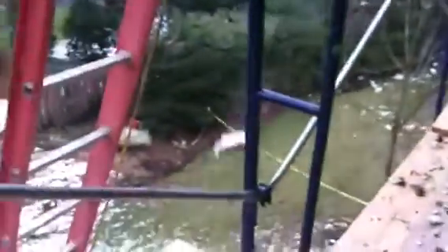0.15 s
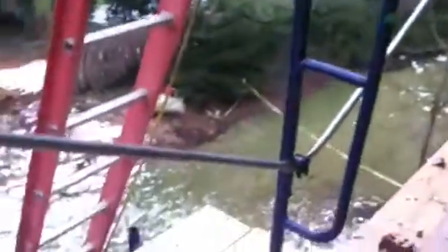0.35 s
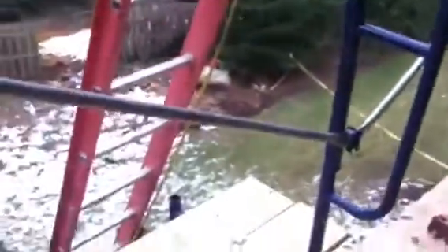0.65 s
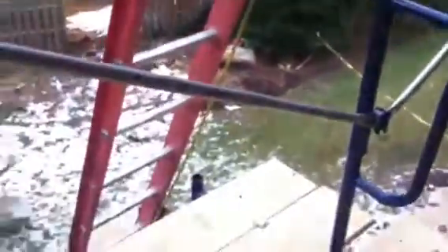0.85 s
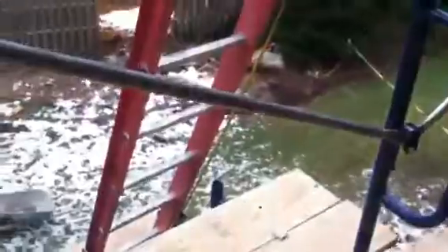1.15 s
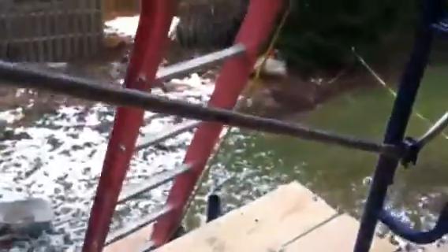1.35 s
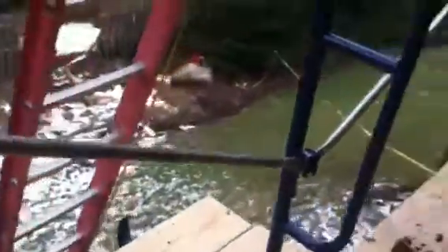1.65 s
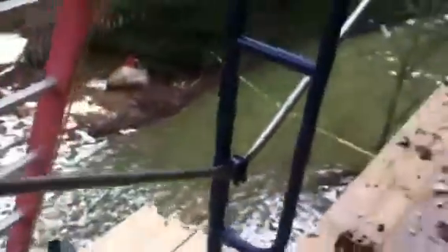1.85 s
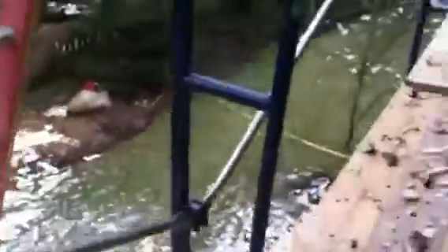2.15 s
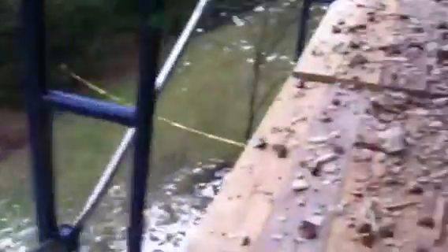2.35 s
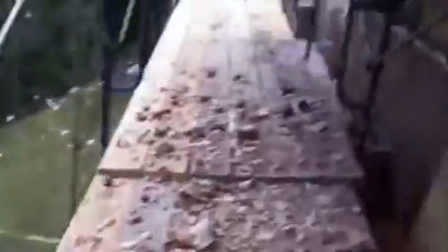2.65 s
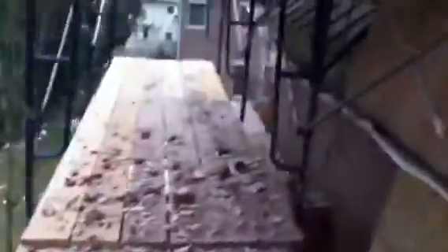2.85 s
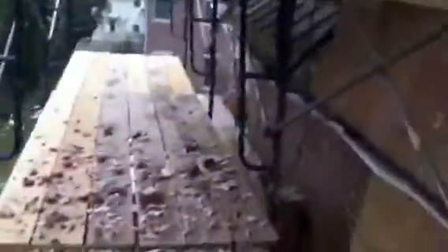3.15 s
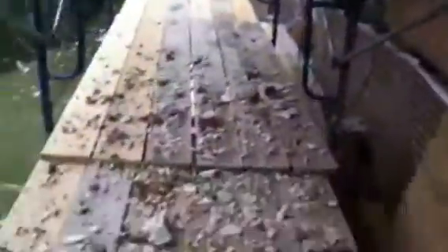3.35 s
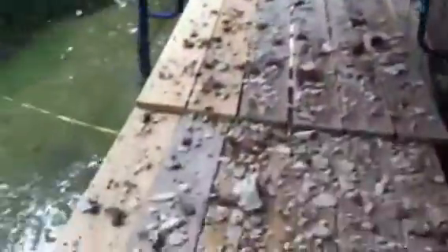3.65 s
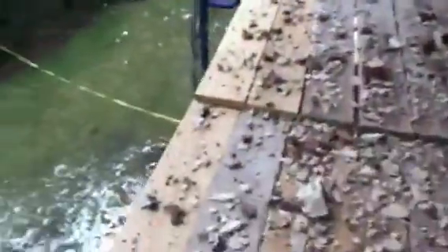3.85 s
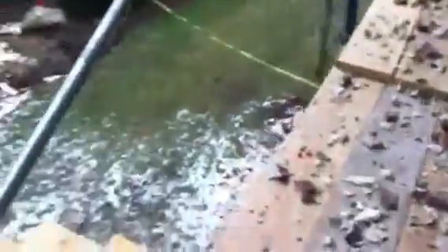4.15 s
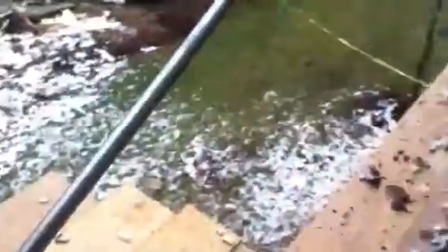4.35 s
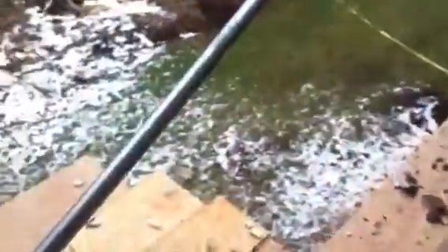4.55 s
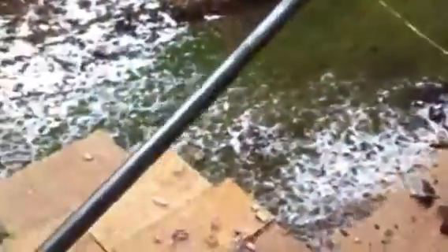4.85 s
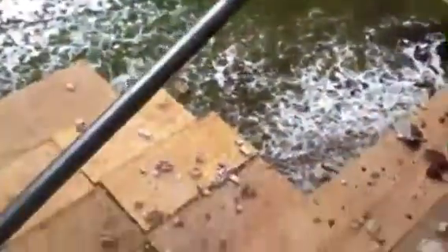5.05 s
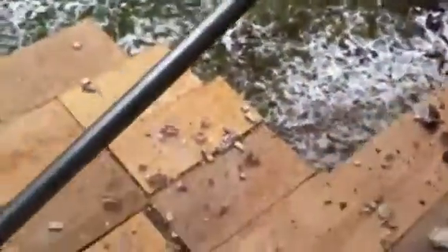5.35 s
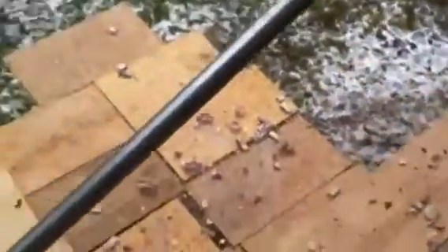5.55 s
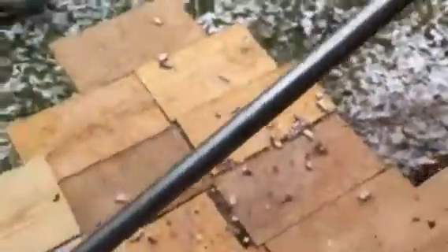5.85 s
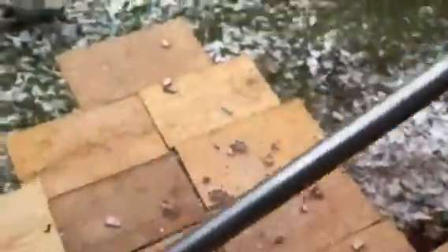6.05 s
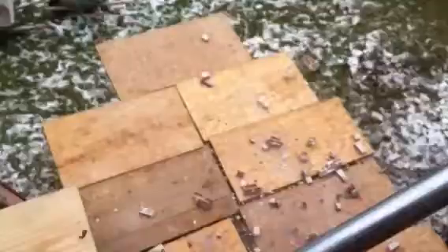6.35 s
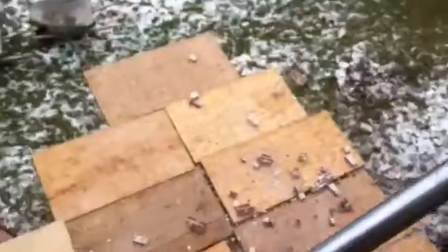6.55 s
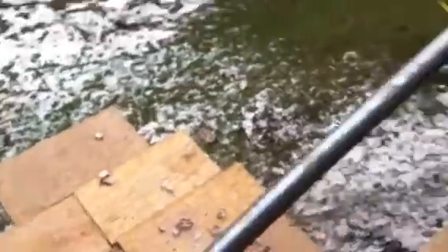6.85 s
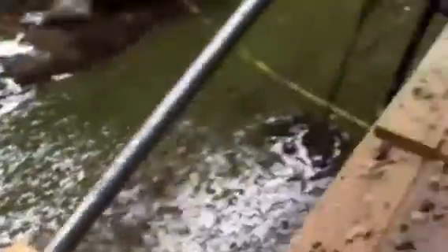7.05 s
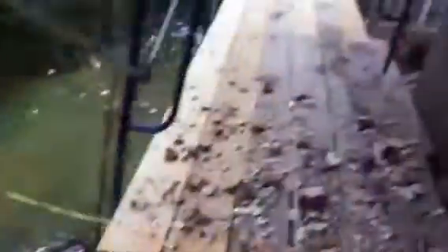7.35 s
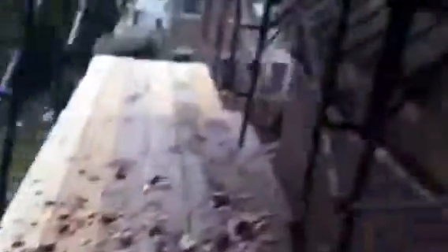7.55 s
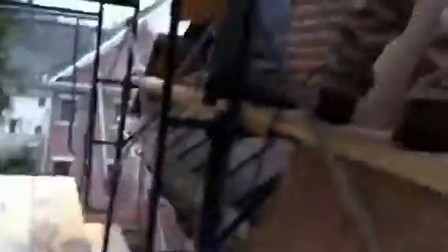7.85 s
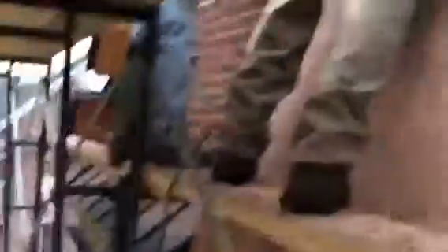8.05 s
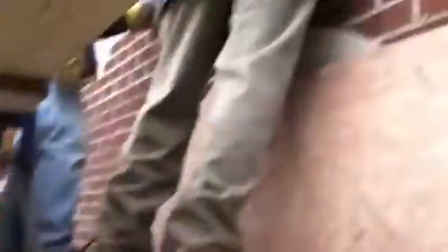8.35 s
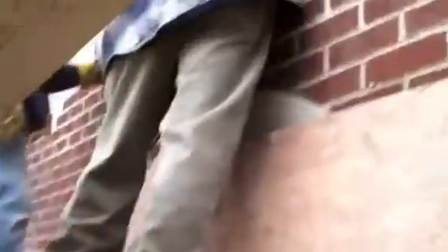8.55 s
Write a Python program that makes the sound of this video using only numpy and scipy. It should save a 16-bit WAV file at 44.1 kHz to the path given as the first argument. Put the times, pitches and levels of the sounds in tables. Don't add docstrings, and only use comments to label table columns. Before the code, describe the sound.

Quiet yard noise and rapid light brick taps open; then a motor whirs upward as a brick chunk lands with a woody crack. Bright steel chatter comes in separate bursts against the wall, followed by continuous fast machine-gun hammering, gritty and ringing, with thuds in brick, boards and tubes. The tone shifts as the listener turns on the scaffold. Thin bass, limited loudness, close small microphone.

```python
import sys
import numpy as np
from scipy import signal
from scipy.fft import rfft, irfft, next_fast_len
from scipy.io import wavfile
from scipy.ndimage import uniform_filter1d, minimum_filter1d, map_coordinates

SR = 44100
rng = np.random.default_rng(int(sys.argv[2]) if len(sys.argv) > 2 else 0)


def generate_wav(sig):
    pcm = np.round(np.clip(np.atleast_2d(sig).T, -1, 1) * 32767).astype(np.int16)
    wavfile.write(sys.argv[1], SR, pcm)


def attenuation_scalar(level_db):
    decades = np.asarray(level_db, float) / 20
    return 10 ** decades


N = 383669

# time_s, rate_hz
PISTON_RATE = [(0, 53), (3.5, 52.6), (3.85, 50), (4.1, 48.6), (4.45, 47.9), (7, 47.86), (7.3, 47.93),
               (8.7, 47.92)]
BLOW_AT_S = 6.0088
# start_s, peak_db
STRIKES = [(1.6113, -7), (1.6308, -8), (1.6477, -17), (1.7011, -18), (1.753, -12.5), (1.7694, -6),
           (1.7864, -17), (1.8109, -12), (1.8757, -21), (1.8907, -19), (1.9121, -13), (1.9311, -11),
           (1.944, -4), (1.9889, -19), (2.0558, -7.5), (2.0728, -7), (2.0902, -4), (2.1097, -11),
           (2.1326, -15), (2.2025, -25), (2.2174, -18), (2.2389, -18), (2.2573, -10), (2.2743, -10),
           (2.3047, -11), (2.3446, -20), (2.4065, -14), (2.426, -19), (2.4439, -13), (2.4634, -14),
           (2.4818, -13), (2.5138, -12), (2.5522, -16), (2.6065, -4), (2.622, -1), (2.7562, -22),
           (2.7772, -14), (2.7961, -24), (2.8156, -27), (2.9962, -21), (3.0336, -15), (3.0535, -18.5),
           (3.1937, -6), (3.2107, -8), (3.2276, -2), (3.2461, -5), (3.3384, -15), (3.3558, -10),
           (3.3888, -9), (3.4855, -5)]
# touch_s, rise_s, fall_s, ring_peak_db, scrape_peak_db
BOUNCES = [(1.624, 0.0064, 0.055, -5.5, -14), (1.75, 0.053, 0.037, -5.5, -15.5),
           (1.891, 0.086, 0.042, -9.5, -16), (2.055, 0.054, 0.047, -6, -16.5),
           (2.238, 0.073, 0.058, -6.5, -16.5), (2.422, 0.074, 0.074, -7, -15.5),
           (2.606, 0.0043, 0.095, -4.5, -13.5), (2.776, 0.033, 0.048, -16.5, -21.5),
           (2.994, 0.0038, 0.56, -43, -27.5), (3.029, 0.028, 0.034, -18, -34),
           (3.192, 0.054, 0.023, -5.5, -23), (3.336, 0.042, 0.057, -6.5, -19)]
# time_s, ring_db, push_db
WORK = [(3.477, -30, -37), (3.5, -14, -20), (4, -16, -19.5), (4.5, -20, -21), (4.75, -18, -17.5),
        (5.4, -19, -17.5), (6.1, -16, -17.5), (6.3, -15.5, -19.5), (7.2, -19, -18), (7.45, -15.5, -17.5),
        (8.7, -18, -19.5)]
# centre_s, length_s, ring_db, push_db
SLIPS = [(3.52, 0.073, 4, -1.5), (3.62, 0.056, -5, -7), (3.74, .03, 8, 3.5), (3.84, 0.053, 11, 2.5),
         (3.91, 0.15, -1.5, -3.5), (4.03, 0.12, 1, -1.5), (4.3, 0.21, 4.5, 1), (4.4, 0.16, -3.5, -4),
         (4.51, 0.039, 3.5, 0), (4.81, 0.091, 6.5, 0), (4.865, 0.052, -4, -1), (5.13, 0.078, -1.5, -1),
         (5.385, 0.073, 8, 2), (5.48, 0.044, -1, -3), (5.64, 0.34, 5.5, 0.5), (5.74, 0.13, -5.5, -2),
         (5.89, 0.026, 13.5, 9), (6.14, 0.087, 5, 0.5), (6.21, 0.15, -3.5, -2), (6.49, 0.13, 2, 0.5),
         (7.39, 0.079, 4.5, 1), (7.7, 0.016, 7, 2), (7.87, 0.047, 2.5, -2), (8.1, 0.045, 7, 4),
         (8.6, 0.14, -2, 1.5), (8.69, 0.076, 4, 2)]
# time_s, share (0-1)
LOOSENESS = [(3.4, .6), (4.5, .72), (5.7, .78), (5.9, .45), (6.3, .3), (7.25, .32), (7.35, .6), (7.55, .55),
             (7.7, .45)]
# time_s, share (0-1)
REPEATABILITY = [(3.5, .2), (3.9, .5), (4.3, .65), (4.4, .4), (4.6, .7), (6.3, .78), (7.3, .77), (7.45, .6),
                 (7.7, .77)]
BIT_HZ = [4890, 7580, 7870, 8300, 8750, 10000, 10700, 11310, 12500, 14505, 15700]
# width_hz, level_db
BIT_WIDTHS = [(60, -8), (62, 5.5), (56, 8), (450, -14), (170, -9), (95, -14.5), (119, -23), (179, -20),
              (150, -21), (70, -14), (120, -22)]
# centre_s, length_s, level_db
GRIP = [(1.65, .08, 0), (1.81, .06, 5), (1.96, .12, 0), (2.1, 0.098, 7), (2.28, .06, -8),
        (2.335, 0.027, 15), (2.5, .15, -10), (2.63, .06, -17), (2.69, .03, 6), (3.2, .04, -2),
        (3.25, .04, -3), (2.8, .1, -6), (3.6, .25, -6), (3.85, 0.083, -3), (4.8, 0.28, 5.5),
        (5.48, 0.092, 1), (5.66, .12, -2), (6.4, .2, -3), (7.3, .4, 3), (7.6, .12, -4), (5.4, 0.93, 8),
        (6.5, 0.93, 5.5), (8.4, 0.73, -6)]
# pitch_hz, width_hz, level_db
SHANK = [(2670, 90, 0), (3880, 85, 0)]
SHANK_DB = [
    [-34.5, -32.5, -33.5, -39, -31.5],
    [-40, -39.5, -43, -35.5, -43.5],
]
SHANK_LOOSE_DB = [8, 4]
# centre_s, length_s, low_mode_db, high_mode_db
TWISTS = [(3.5, 0.081, -4, -4), (4, 0.13, 7.5, 6), (4.337, 0.072, 6.5, 14), (5.07, 0.074, 8, 11),
          (5.42, .08, 5, -6), (5.595, 0.15, 4, 1), (5.78, .15, 2, 0), (5.907, 0.11, 13, -7),
          (6.937, 0.097, 1, 6), (6.68, .15, -3, 2), (7.172, 0.13, 2, 4), (7.7, .25, -2, 2),
          (7.373, 0.29, 0, 11.5), (8.117, 0.089, 1, -5), (8.656, 0.18, 8, 2)]
SCRAPE_BENDS = [0.22, 0.082]
# pitch_hz, level_db
SKID = [(100, -18), (200, -4), (600, -3.5), (1400, -10), (2500, -3), (3400, 0.5), (3900, -6), (4400, -8),
        (6300, -11), (9000, -10), (12000, -20), (14000, -55)]
# pitch_hz, level_db
THUD = [(24, -76), (40, -73), (108, -22), (140, -7.5), (282, -0.5), (313, -5.5), (521, -2), (832, -10.5),
        (900, -24), (1170, -18), (1980, -120)]
THUD_DB = [-8.5, -9.5, -9, -9, -8]
# pitch_hz, level_db
CRUSH = [(400, -64), (700, -1), (1200, 2), (1900, 4), (3000, 2), (4400, -9.5), (6300, -9.5), (9500, -11),
         (11800, -18.5), (15500, -38)]
# centre_s, length_s, thud_db, crush_db
CHIPS = [
    (4.75, 0.081, 5.5, 1),
    (5.925, 0.013, 7, 16),
    (7.53, 0.011, 1, -3),
    (8.13, 0.044, 0, -1.5),
]
# time_s, direction (0-4)
TURN = [(4.1, 0), (4.55, 1), (5.0, 1), (5.2, 2), (6.1, 2), (6.3, 3), (7.25, 3), (7.42, 4)]
# pitch_hz, width_hz, lift_db
FRAME = [
    [(197, 130, 8), (330, 86, 2.5), (650, 350, 8), (1340, 160, -6), (1790, 140, 7)],
    [(200, 60, 3.5), (287, 27, 8), (766, 25, 8), (1030, 70, 10), (1150, 30, -7), (1220, 70, 9.5),
     (1470, 130, 5), (1920, 180, 5)],
    [(240, 25, 7), (287, 22, 11), (332, 25, -14), (403, 70, 9.5), (750, 53, 4.5), (980, 65, -10),
     (1170, 200, 5.5), (1330, 60, -11), (1466, 150, 8), (1590, 60, -6), (1890, 70, -7), (2080, 70, 4)],
    [(274, 92, 5.5), (521.7, 17, 8), (575, 20, -7), (628, 23, 11), (875, 54, -4), (1160, 130, 2.5),
     (1490, 92, 5), (1720, 210, 3.5), (2020, 210, 7)],
    [(143, 25, 8), (187, 13, 11.5), (527, 14, 6), (575, 20, -4), (629, 28, 8), (814, 25, 9),
     (950, 140, 4.5), (1450, 100, 6.5), (1790, 100, 3.5), (1915, 30, -6)],
]
SLAP_S = [.002, .003, .004, .003, .0007]
SLAP_DB = [14, 14, 17, 22, 20]
OPEN_DB = [-3, -1, 1.5, 0.5, -3]
# time_s, level_db, low_lift_db
MOTOR = [(0.5, -49, -7), (0.62, -31, -16), (0.76, -27.5, -11), (0.82, -33.5, 4), (1.45, -28.5, -6.5),
         (2, -33.5, 5.5), (2.3, -34, -8.5), (2.8, -33.5, -3.5), (2.87, -33.5, -16), (2.98, -30, -29),
         (3.03, -29, -3), (3.15, -28.5, -6.5), (3.5, -38.5, -1)]
# pitch_hz, level_db
FAN = [(35, -80), (60, -46), (120, -8), (234, -1.5), (355, -5), (605, -9), (982, -8.5), (2200, -5.5),
       (4840, -15.5), (5430, -15.5), (11400, -30.5), (15000, -56)]
# pitch_hz, width_hz, level_db
HOUSING = [(3250, 70, 6), (5960, 60, 9)]
# time_s, drop_hz
LOAD_SAG = [(1.6, 0), (1.75, 330), (2.3, 400), (2.5, 500), (2.87, 460), (3.05, 280), (3.18, 240),
            (3.3, 400)]
# time_s, level_db
WHINE = [(.82, -62), (1, -51), (1.1, -42), (1.53, -37), (1.62, -54), (2.2, -46), (2.5, -46), (2.7, -52),
         (2.88, -45), (3.05, -41), (3.17, -40), (3.25, -52), (3.5, -60)]
# share of mesh pitch, level_db
GEARS = [(.265, -7), (.44, -10), (.5, 1), (.6, -10), (.73, -10), (.95, -22), (1.1, -23)]
# share of mesh pitch, level_db
HUM = [(.31, -9), (.41, -9), (.585, -12), (1.42, -24), (1.649, -16), (2, -29)]
# start_s, peak_db, low_part_db, t60_s
TAPS = [
    (0.044, -28, -5, 0.17),
    (0.103, -31, -16, 0.12),
    (0.124, -24.5, -2, 0.12),
    (0.172, -15, -8.5, 0.16),
    (0.245, -18, -5, 0.16),
    (0.297, -22.5, 5, 0.21),
    (0.35, -23.5, -4, 0.072),
    (0.407, -32, -9, 0.08),
    (0.533, -29, -28, 0.098),
]
# pitch_hz, level_db
BRICK = [(290, -19), (500, -16), (936, -11), (1190, -17), (1290, -10), (1550, -9), (2480, -18), (2820, -33),
         (14000, -50)]
# start_s, peak_db, crack_db, t60_s
DROPS = [
    (0.799, -5.5, 5, 0.46),
    (1.246, -13.5, 1.5, 0.56),
    (1.479, -26, -15, 0.45),
    (1.509, -21, -13, 1),
    (1.549, -17, -15, 0.46),
    (4.739, -21, 15, 0.46),
]
# pitch_hz, width_hz, level_db
PLYWOOD = [(170, 113, -3.5), (290, 87, 3.5), (432, 130, -1.5), (640, 200, -10)]
# pitch_hz, level_db
SPLIT = [(410, -43), (700, 6), (893, -16), (1020, -1), (2660, -6), (6040, -34), (8110, -23.5), (15000, -51)]
# pitch_hz, level_db
YARD = [(47, -54), (80, -5), (151, 6), (325, -3), (493, 7), (684, -0.5), (2780, -1.5), (5980, -20.5),
        (8120, -7), (15000, -45)]
# time_s, level_db
YARD_LEVEL = [(0.0, -45), (0.284, -55), (0.368, -45), (0.6, -42)]
# pitch_hz, level_db
PLANKS = [(20, -30), (60, -13), (130, -4), (200, -7), (400, -60)]


def bit(bite_db):
    burst, scratch = bounces()
    level = burst + attenuation_scalar(bite_db + 0.8 * wobble(9.6))
    accent = accents(burst)
    blow, _ = piston()
    shake = shocks(along(LOOSENESS), scatter_db=1.4, t60=.012, clean=.4, accent=accent)

    def ping():
        return attenuation_scalar(1.6 * rng.standard_normal(blow.max() + 1))[blow]

    low, *high = rings(shake, [(hz, *mode) for hz, mode in zip(BIT_HZ, BIT_WIDTHS)])
    ring = -attenuation_scalar(bumps(GRIP)[0]) * ping() * low
    for k, mode in enumerate(high):
        ring = ring + (-1) ** min(k, 3) * attenuation_scalar(1.6 * wobble(11)) * mode

    bend = 0
    settings = zip(SCRAPE_BENDS, SHANK_DB, SHANK_LOOSE_DB, bumps(TWISTS), rings(shake, SHANK))
    for share, db, loose_db, twist_db, mode in settings:
        bend_db = 0.5 * (bite_db + 12) + facing(db)
        bend_db = bend_db + loose_db * along(LOOSENESS) + twist_db + 0.7 * wobble(13)
        gain = share * scratch + (bite_db > -60) * attenuation_scalar(bend_db)
        bend = bend + gain * ping() * unit(mode)

    scrape = shocks(0.49, scatter_db=1.5, t60=0.14, accent=np.sqrt(accent))
    scrape = unit(filtered(scrape, colour(SKID)))
    return attenuation_scalar(-0.97) * level * even(ring) + bend + attenuation_scalar(-4.0) * scratch * scrape


def wall(bite_db, push_db):
    thud_db, crush_db = push_db + bumps(CHIPS)
    thud_db = thud_db + facing(THUD_DB) + 0.5 * wobble(9.2)
    crush_db = crush_db + 0.38 * wobble(11)
    blow, _ = piston()
    strength = attenuation_scalar(1.1 * rng.standard_normal(blow.max() + 1))[blow]
    blows = (np.diff(blow, prepend=blow[0]) != 0) * strength
    repeat_hz = 2570
    t = np.arange(3685) / SR
    f = np.fft.rfftfreq(len(t), 1 / SR)
    turn, echo = along(TURN), 0
    for k, view in enumerate(FRAME):
        slap = attenuation_scalar(SLAP_DB[k]) * (np.arange(len(t)) == round(SLAP_S[k] * SR))
        tails = rng.standard_normal((2, len(t))) * attenuation_scalar(-60 * t / .14)
        z = rfft(tails - [slap, 0 * t])
        lift = attenuation_scalar(sum(db / (1 + (2 * (f - c) / w) ** 2) for c, w, db in view))
        lift = lift / (1 + (f / repeat_hz) ** 6)
        firm, drift = irfft(z / np.abs(z) ** .9 * lift, len(t))
        near = blows * np.sqrt(np.clip(1 - np.abs(turn - k), 0, 1))
        echo = echo + signal.oaconvolve(near, firm)[:N]
        echo = echo + signal.oaconvolve(0.61 * near * wobble(2.203), drift)[:N]
    grit = unit(shocks(0.4, scatter_db=1.2, t60=0.15))
    grit = filtered(grit, lambda f: attenuation_scalar(5 / (1 + (repeat_hz / (f + 1)) ** 6)))
    same = along(REPEATABILITY)
    force = np.sqrt(same) * even(echo) + np.sqrt(1 - same) * 2.6 * grit
    thud = attenuation_scalar(thud_db) * even(filtered(force, colour(THUD)))
    crush = attenuation_scalar(crush_db - 2.5) * even(filtered(force, colour(CRUSH)))
    return (bite_db > -60) * (thud + crush)


def chisel():
    bite_db, push_db = work()
    tool = bit(bite_db) + wall(bite_db, push_db)

    def thin(f):
        return 1 / (1 + ((f - 5900) / 750) ** 4) + 1 / (1 + ((f - 12500) / 800) ** 4)

    return tool + (attenuation_scalar(facing(OPEN_DB)) - 1) * filtered(tool, thin)


def piston():
    t = np.arange(N) / SR
    rate = along(PISTON_RATE)
    turns = np.cumsum(rate) / SR
    turns = turns - turns[round(BLOW_AT_S * SR)] + 400
    hits = np.r_[0, np.sort(np.transpose(STRIKES)[0])]
    last = np.searchsorted(hits, t, "right") - 1
    early = t < WORK[0][0]
    blow = np.where(early, last, turns.astype(int))
    return blow, np.where(early, t - hits[last], (turns % 1) / rate)


def shocks(loose, scatter_db, t60, clean=0, accent=1):
    blow, since = piston()
    strength, rebound = rng.standard_normal((2, blow.max() + 1))[:, blow]
    later = since - .006 - 0.0013 * rebound
    struck = attenuation_scalar(-60 * since / t60) + .45 * (later > 0) * attenuation_scalar(-60 * np.abs(later) / t60)
    rattle = unit(attenuation_scalar(4 * wobble(220) + 1.6 * wobble(25)))
    loose = np.clip(loose, 0, 1)
    size = accent * attenuation_scalar(scatter_db * strength)
    at = np.flatnonzero(np.diff(blow)) + 1
    scatter = np.round(.0001 * SR * rebound[at]).astype(int)
    late = np.clip(at + scatter, 0, N - 1)
    click = np.sqrt((1 - loose) * clean) * unit(np.bincount(late, size[at], N))
    gate = np.sqrt((1 - loose) * (1 - clean)) * unit(size * struck) + np.sqrt(loose) * rattle
    return click + rng.standard_normal(N) * gate


def bounces():
    t, ring, scrape = np.arange(N) / SR, np.zeros(N), np.zeros(N)
    shape_db = [-35, -25, -20.5, 0, -14, -76]
    for s, rise, fall, ring_db, scrape_db in BOUNCES:
        off = s + rise + fall
        times = [s - 0.031, s - .004, s, s + rise, off, off + 0.12]
        under = np.interp(t, times, shape_db, -200, -200)
        ring = ring + attenuation_scalar(ring_db + under)
        scrape = scrape + attenuation_scalar(scrape_db + 0.71 * under)
    return ring, scrape


def accents(burst):
    blow, _ = piston()
    s, db = np.transpose(sorted(STRIKES))
    gain = np.ones(blow.max() + 1)
    swell = burst[(s * SR).astype(int) + 200] + 1e-9
    gain[1:len(s) + 1] = np.clip(attenuation_scalar(db - 3) / swell, .5, 1.9)
    return gain[blow]


def work():
    return np.array(curves(WORK)) + bumps(SLIPS)


def motor():
    t = np.arange(N) / SR
    fan_db, low_db = curves(MOTOR)
    fan = attenuation_scalar(fan_db + .8 + 1.2 * wobble(30)) * hiss(colour(FAN))
    fan = fan + (attenuation_scalar(low_db) - 1) * filtered(fan, lambda f: 1 / (1 + (f / 1100) ** 4))
    fan = fan + (t > .9) * sum(rings(fan, HOUSING))

    mesh_hz, lag_s, speed_up_s = 5760, .34, .315
    hz = mesh_hz * (1 - np.exp(-(t - lag_s) / speed_up_s)) - along(LOAD_SAG)

    def top(f):
        return 1 / (1 + (4130 / (f + 1)) ** 8) / (1 + (f / 7600) ** 8)

    dull = attenuation_scalar(-31 * np.clip(1 - hz / mesh_hz, 0, 1))
    fan = fan + (dull - 1) * filtered(fan, top)
    phase = 2 * np.pi * np.cumsum(hz + 7 * wobble(150)) / SR
    whine = attenuation_scalar(curves(WHINE)[0] + 1.5 * wobble(40)) * np.sin(phase)

    start_s, end_s, rise_s = .54, .795, .2
    wind = 2 * np.pi * np.cumsum(np.interp(t, (start_s, end_s), (2650, 5950))) / SR
    swell = np.clip((t - start_s) / rise_s + 0.083, 0, 1) ** 2 * (t < end_s)
    rising = 0
    for share, db in GEARS:
        rising = rising + attenuation_scalar(db) * (1 + .5 * wobble(90)) * np.sin(share * wind + .6 * wobble(280))
    running = sum(attenuation_scalar(db) * wobble(200) * np.sin(share * phase) for share, db in HUM)
    return fan + whine + attenuation_scalar(-30) * swell * rising + attenuation_scalar(fan_db - 4.5) * (t > .85) * running


def hammer_taps():
    low = modes([(400, 360, -1.5), (603, 270, -0.5)])
    return knocks(TAPS, colour(BRICK), low, extra_share=3.3, push_db=5.0)


def brick_drops():
    return knocks(DROPS, modes(PLYWOOD), colour(SPLIT), extra_share=0.64, push_db=13.0)


def knocks(events, body, extra, extra_share, push_db):
    out, t = np.zeros(N + SR), np.arange(SR // 2) / SR
    push = filtered(np.exp(-t / 0.00025), body) * attenuation_scalar(-60 * t / 0.05)
    push = attenuation_scalar(push_db) * push / np.abs(push).max()

    def shape(t60):
        return (1 - np.exp(-t / 0.0009)) * (attenuation_scalar(-60 * t / t60) + 0.6 * attenuation_scalar(-60 * t / 0.06))

    for s, db, extra_db, t60 in events:
        main = shape(t60) * hiss(body, len(t)) - push
        second = shape(t60 * extra_share) * hiss(extra, len(t))
        out[round(s * SR):][:len(t)] += attenuation_scalar(db - 10.5) * main + attenuation_scalar(db + extra_db - 15.0) * second
    return out[:N]


def planks():
    rumble = attenuation_scalar(-52 + 3.4 * wobble(4.2)) * hiss(colour(PLANKS))
    return rumble * (np.arange(N) / SR > BOUNCES[0][0])


def yard():
    return attenuation_scalar(curves(YARD_LEVEL, off_db=-50)[0] + 2.9 * wobble(18.0)) * hiss(colour(YARD))


def rings(force, rows):
    m = next_fast_len(N + 8192)
    f, z = np.fft.rfftfreq(m, 1 / SR), rfft(force, m)
    out = []
    for c, w, db in rows:
        response = modes([(c, w, 0)])(f) * modes([(c, 7 * w, 0)])(f)
        out.append(attenuation_scalar(db) * irfft(z * response, m)[:N])
    return out


def modes(rows):
    def response(f):
        total = 0
        for k, (c, w, db) in enumerate(rows):
            total = total + (-1) ** k * attenuation_scalar(db) * 1j * f * w / (c * c - f * f + 1j * f * w)
        return total
    return response


def colour(points):
    f, v = np.transpose(points)
    return lambda hz: attenuation_scalar(np.interp(np.log(hz + 1), np.log(f), v))


def filtered(x, response):
    m = next_fast_len(len(x) + 8192)
    return irfft(rfft(x, m) * response(np.fft.rfftfreq(m, 1 / SR)), m)[:len(x)]


def hiss(response, size=N):
    return unit(filtered(rng.standard_normal(size), response))


def unit(x):
    return x / np.sqrt(np.mean(x ** 2) + 1e-20)


def even(x):
    return x / np.sqrt(np.abs(uniform_filter1d(x ** 2, SR // 6)) + 1e-9)


def wobble(rate):
    coarse = np.arange(0, N + 16, 16)
    knots = rng.standard_normal(int(N * rate / SR) + 4)
    return np.interp(np.arange(N), coarse, map_coordinates(knots, [coarse * rate / SR]))


def curves(rows, off_db=-90):
    s, first, *cols = np.transpose(rows)
    t = np.arange(N) / SR
    return [np.interp(t, s, first, off_db, off_db)] + [np.interp(t, s, c) for c in cols]


def along(rows):
    return np.interp(np.arange(N) / SR, *np.transpose(rows))


def facing(values):
    return np.interp(along(TURN), np.arange(len(values)), values)


def bumps(rows):
    t, out = np.arange(N) / SR, np.zeros((len(rows[0]) - 2, N))
    for s, length, *db in rows:
        near = slice(round((s - 2 * length) * SR), round((s + 2 * length) * SR))
        out[:, near] += np.outer(db, np.exp(-(2 * (t[near] - s) / length) ** 2))
    return out


def scene():
    return (chisel() + motor() + hammer_taps() + brick_drops() + planks() + yard())[None]


def low_pass(x):
    return signal.sosfilt(signal.butter(12, 16470, fs=SR, output="sos"), x)


def record(dry):
    def microphone(f):
        return (1j * f / (90 + 1j * f)) ** 2 / (1 + (f / 12500) ** 6) * (f < 15780)

    x = filtered(dry[0], microphone)
    need = np.minimum(1, .73 / (np.abs(x) + 1e-9))
    gain = uniform_filter1d(minimum_filter1d(need, size=257), size=129)
    return low_pass((gain * x)[None])


dry = scene()
out = record(dry)
generate_wav(out)
```